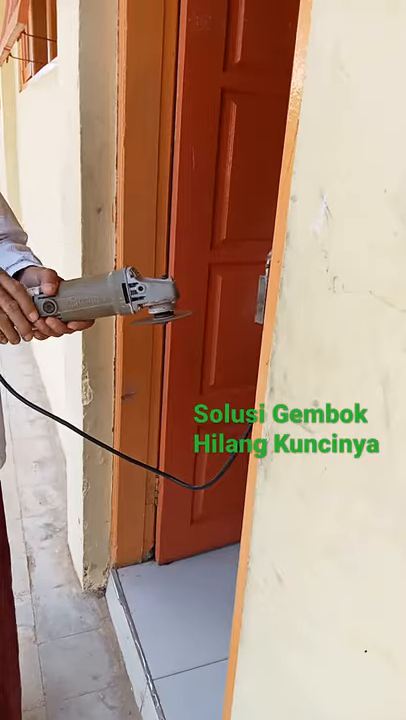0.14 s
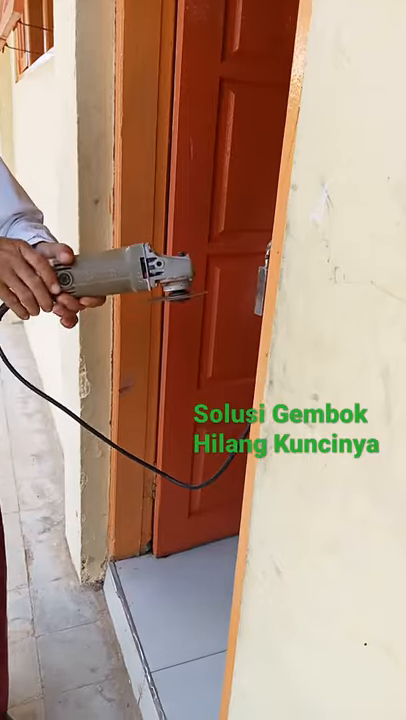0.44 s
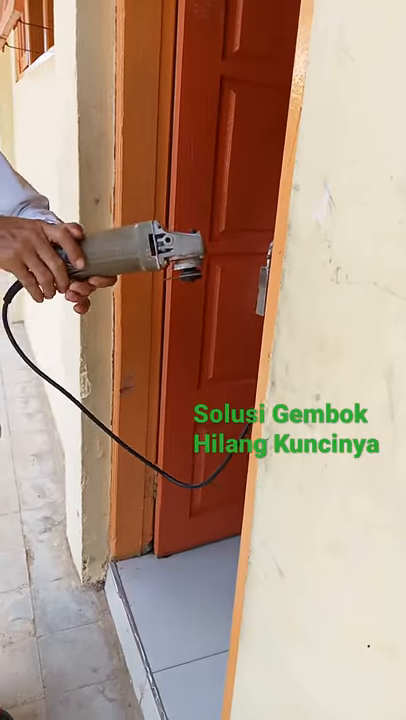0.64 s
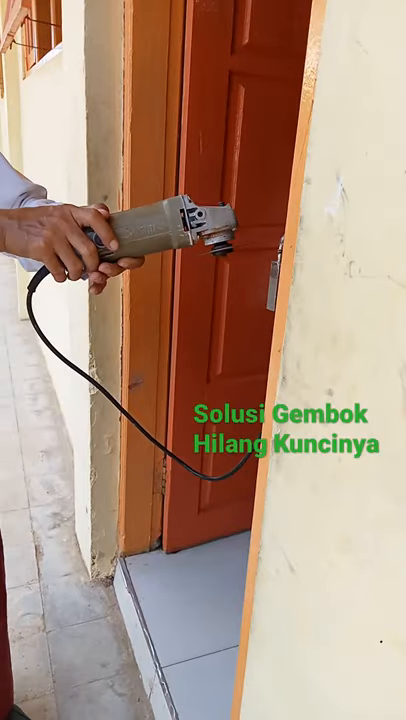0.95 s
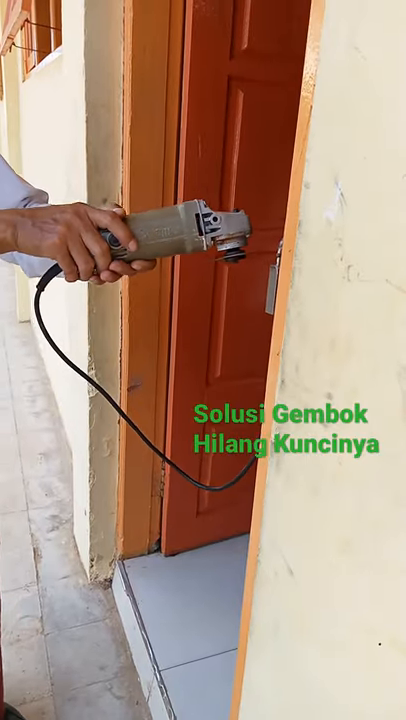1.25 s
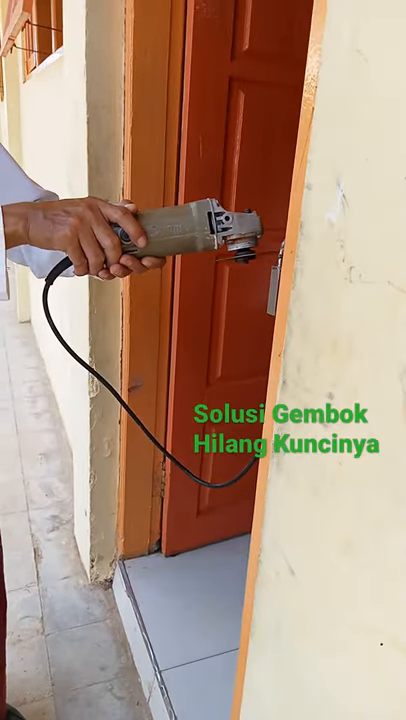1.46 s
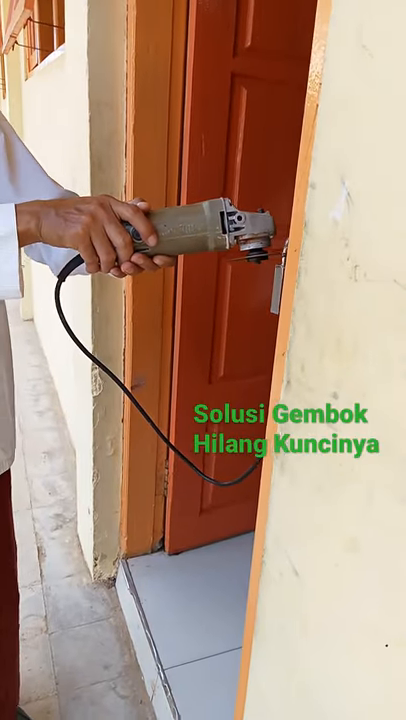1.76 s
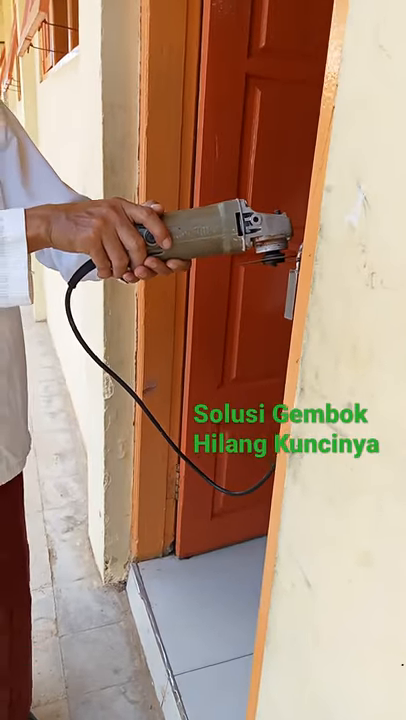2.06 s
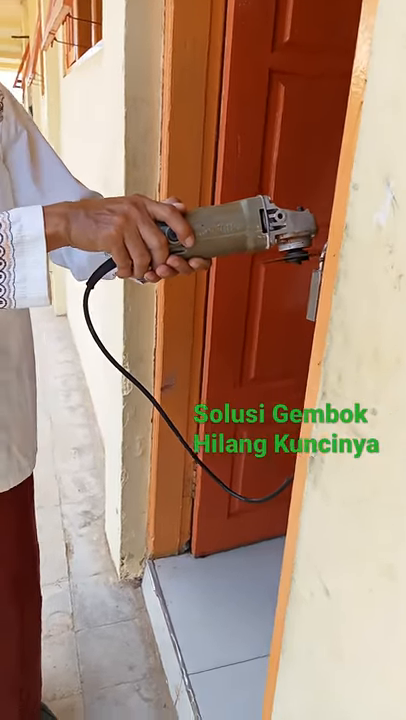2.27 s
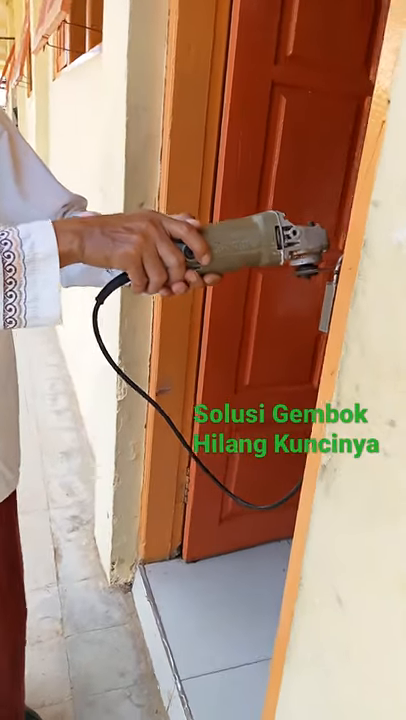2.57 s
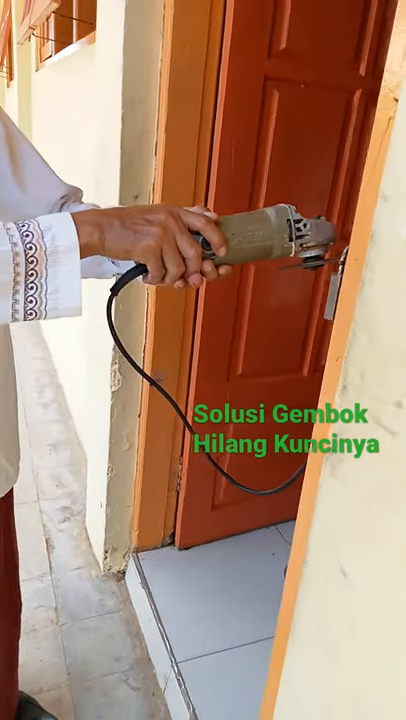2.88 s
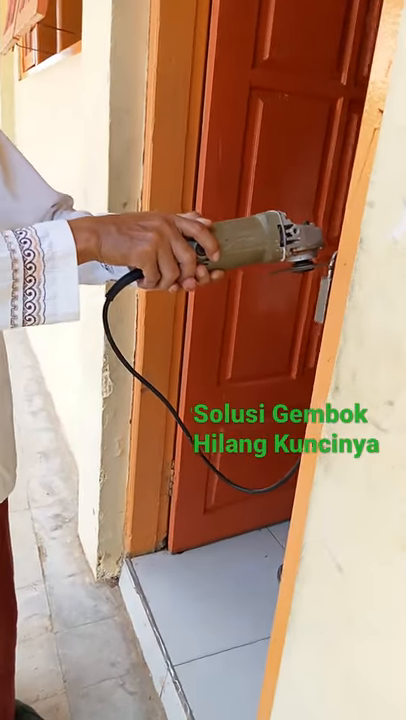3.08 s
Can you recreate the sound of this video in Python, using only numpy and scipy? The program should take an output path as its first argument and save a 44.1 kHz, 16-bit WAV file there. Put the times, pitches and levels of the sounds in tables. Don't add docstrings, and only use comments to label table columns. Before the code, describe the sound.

An angle grinder starts after about 0.08 s of silence, swelling to full roar by 0.35 s. Its high gear whine climbs quickly, then more slowly, nearly levelling by 2 s, strongest near 2.2 s. Bright rushing air, dense housing rattle, small gear knocks and faint metallic disc rings continue to 3.2 s, the tone shifting as the tool turns. No cutting; tight porch reflections, close mono phone sound, still running at the end.

```python
import sys
import numpy as np
from scipy import signal
from scipy.io import wavfile
from scipy.ndimage import uniform_filter1d, map_coordinates

SR = 44100
rng = np.random.default_rng(int(sys.argv[2]) if len(sys.argv) > 2 else 0)


def persist_wave(psi):
    counts = np.round(np.clip(psi, -1, 1) * 32767).astype(np.int16)
    wavfile.write(sys.argv[1], SR, np.atleast_2d(counts).T)


def ratio(d):
    e = np.asarray(d, float) / 20
    return 10 ** e


N = 142884

# time in seconds, roar in dB, guard ring in dB,
# brightness in dB, low body in dB.
MOTOR = [(.085, -40, -1, 5, -1), (.16, -30.5, 4, 2.5, 6.5), (.25, -23.5, 1, 1, -0.5),
         (.34, -18.5, 6.5, 1.5, 4), (.5, -19, 8.5, 5.5, 3), (.7, -19, 8.5, 3, 1.5), (.9, -18, 4.5, 2, 0.5),
         (1.1, -18.5, 2.5, 1, 0.5), (1.35, -18.5, -1, 1, 0), (1.6, -18, -2, 1, 1),
         (1.85, -18, -11, -0.5, -1.5), (2.1, -16.5, -6, -0.5, -4), (2.3, -17.5, -11, 1, 3),
         (2.55, -17.5, 1.5, -1.5, 2), (2.8, -18, -4, -2, -2), (3.0, -18.5, 0.5, -0.5, -1),
         (3.24, -17, -3, -2, -5)]
# centre in Hz, width in Hz, level in dB.
HOUSING = [(398, 242, -8), (838, 137, -2.5), (986, 106, -4.5), (1259, 375, 0.5), (1770, 150, -5.5),
           (2093, 100, -3.5), (2546, 93, -7), (3334, 350, -1), (4785, 500, 3), (7340, 840, 5.5),
           (9440, 860, 8), (9945, 1450, 3), (11100, 430, -12), (15200, 700, -11)]
# frequency in Hz, level in dB per Hz.
AIR = [(35, -61), (60, -17), (570, -13), (1320, 2.5), (4010, -3), (4820, 3.5), (7860, -10), (9460, -1.5),
       (15400, -12.5)]
# time in seconds, unbalance in dB, second pinion harmonic in dB.
TURN = [
    (.1, 0, 0),
    (.5, 2, 0),
    (1.15, -1, -8),
    (1.3, -9, -9),
    (1.9, -5, -8),
    (2.3, 2, 2),
    (2.75, 0, 2),
    (2.95, -7, -4),
    (3.24, -8, -5),
]
# time in seconds, extra path in m.
DOOR = [
    (0, 1.13),
    (1.0, 0.72),
    (2.0, 0.44),
    (3.24, 0.24),
]
# delay in seconds, level in dB.
WALLS = [(.0043, -17), (.0071, -24.5), (.0118, -20.5), (.0173, -11), (0.025, -26.5)]
# time in seconds, pinion in dB, fan in dB.
WHINE = [(.1, -52, -55), (.19, -31, -42), (.52, -24, -63), (.68, -26, -27), (.76, -33, -39),
         (.92, -28, -30), (.99, -33, -40), (1.04, -25.5, -48), (1.14, -35, -44), (1.22, -26.5, -40),
         (1.4, -30, -32), (1.55, -25, -38), (2.2, -20.5, -26), (2.45, -24, -28.5), (2.6, -35, -30),
         (2.85, -32, -30), (2.95, -25.5, -32), (3.24, -23, -27.5)]
# multiple of the shaft, level in dB.
ROTOR = [(1, -38), (3, -50), (5, -50), (11, -46), (13, -50), (24, -44)]
# time in seconds, echo strength 0-1.
FLOOR_ECHO = [
    (0, .2),
    (.3, .55),
    (.7, .45),
    (.9, 0),
    (3.24, 0),
]
# time in seconds, peak in dB.
KNOCKS = [(0.0864, -32), (0.1024, -19), (0.1565, -10), (0.184, -10), (0.483, 3), (0.7064, 0), (0.8205, 0),
          (2.168, -43), (2.1966, -2), (2.4485, -3), (2.54, -5), (2.698, 2), (2.8294, -4), (3.03, -5)]
# start in seconds, length in seconds, frequency in Hz, level in dB.
DISC = [
    (0.884, 0.16, 2515, -28.5),
    (0.995, 0.34, 987, -30.5),
    (1.05, .25, 1770, -31.5),
    (1.554, 0.23, 1770, -30),
    (1.65, 0.36, 1585, -33),
    (2.35, 0.14, 223, -39.5),
    (2.444, 0.33, 1310, -26.5),
    (2.72, 0.13, 2540, -28),
    (2.74, 0.1, 1457, -27),
    (2.95, 0.17, 2545, -32.5),
]
# centre in Hz, width in Hz, depth 0-1.
MIC_DIPS = [(7640, 1170, 0.64), (11940, 1040, 0.42), (560, 270, 0.17)]

FULL_ROAR_DB, HOUSING_DB, AIR_DB, RUMBLE_DB = -18.5, -0.5, -3, -66
RATTLES_PER_S, RATTLE_SPREAD_DB, RATTLE_DB = 900, 3, -4
DOOR_DB, SOUND_M_PER_S = -18, 343
TOP_HZ, LAG_HZ, LAG_S, SURGE_HZ, SURGE_S = 530.3, 130.5, .62, 27, .125
PINION_TEETH, FAN_MULTIPLE, FLOOR_LAG_S = 12, 4, .007576
CHATTER_DB, CHATTER_PER_S = -30, 430
KNOCK_DB, KNOCK_S = -11, .0013
DISC_WIDTH_HZ = 17
START_S, FADE_S, MIC_LOW_HZ, MIC_TOP_HZ, HEADROOM = 0.0787, 0.0017, 85, 15500, 1.6


def level(x, db):
    return x * ratio(db) / np.sqrt(np.mean(x ** 2))


def curve(table, col):
    table = np.array(table)
    return np.interp(np.arange(N) / SR, table[:, 0], table[:, col])


def walk(rate_hz):
    hold = int(SR / rate_hz)
    steps = np.repeat(rng.standard_normal(N // hold + 1), hold)
    return 1.18 * uniform_filter1d(uniform_filter1d(steps, hold), hold)[:N]


def ring(x, hz, width_hz):
    return signal.lfilter(*signal.iirpeak(hz, hz / width_hz, SR), x)


def ring_twice(x, hz, width_hz):
    return ring(ring(x, hz, width_hz), hz, width_hz)


def facing_db(hz):
    if hz > 8000:
        return curve(MOTOR, col=3)
    if 4000 < hz < 5500:
        return curve(MOTOR, col=2)
    return curve(MOTOR, col=4) * (hz < 1600)


def housing():
    chance = rng.random((3, N))
    size_db = np.minimum(-RATTLE_SPREAD_DB * np.log(chance[1] + 1e-9), 14)
    hits = (chance[0] < RATTLES_PER_S / SR) * ratio(size_db) * np.sign(chance[2] - .5)
    drive = rng.standard_normal(N) + level(hits, RATTLE_DB)
    drive = drive * ratio(0.98 * walk(8.8) + 1.23 * walk(70))
    out = 0
    for hz, width_hz, db in HOUSING:
        wander_db = (.8 if hz > 4000 else 1.3) * walk(5)
        mode = level(ring_twice(drive, hz, 1.095 * width_hz), 0)
        out = out + ratio(db + wander_db + facing_db(hz)) * mode
    return level(out, HOUSING_DB)


def air():
    out, gust, spectrum = 0, walk(5.61), np.array(AIR)
    for hz in 30 * 2 ** np.arange(0, 9.2, 1 / 3):
        band = ring_twice(rng.standard_normal(N), hz, hz / 3)
        db = np.interp(np.log(hz), np.log(spectrum[:, 0]), spectrum[:, 1])
        db = db + .5 * gust + 0.96 * walk(12)
        if hz < 700:
            db = db + .5 * curve(TURN, col=1)
        if hz > 10000:
            db = db + curve(MOTOR, col=3)
        out = out + ratio(db) * band
    return level(out, AIR_DB)


def porch(roar):
    heard_at = np.arange(N) - curve(DOOR, col=1) / SOUND_M_PER_S * SR
    roar = roar + ratio(DOOR_DB) * map_coordinates(roar, [heard_at], mode="mirror")
    return roar + sum(ratio(db) * np.roll(roar, int(s * SR)) for s, db in WALLS)


def whine():
    t = np.arange(N) / SR
    shaft_hz = TOP_HZ - LAG_HZ * np.exp(-t / LAG_S) - SURGE_HZ * np.exp(-t / SURGE_S)
    turns = np.cumsum(shaft_hz + .15 * walk(30)) / SR

    def tone(multiple, db):
        return np.sqrt(2) * ratio(db) * np.sin(2 * np.pi * (multiple * turns + rng.random()))

    pinion = tone(PINION_TEETH, curve(WHINE, col=1) + 1.8 * walk(35))
    pinion = pinion + curve(FLOOR_ECHO, col=1) * np.roll(pinion, round(FLOOR_LAG_S * SR))
    fan = tone(FAN_MULTIPLE, curve(WHINE, col=2) - .5 + 2.8 * walk(80))
    roar_rise_db = curve(MOTOR, col=1) - FULL_ROAR_DB
    chatter_db = CHATTER_DB + roar_rise_db + .5 * curve(TURN, col=2)
    out = pinion + fan + walk(CHATTER_PER_S) * tone(PINION_TEETH, chatter_db)
    for multiple, db in ROTOR:
        if multiple == 1:
            turn_db = curve(TURN, col=1)
        elif multiple == 2 * PINION_TEETH:
            turn_db = curve(TURN, col=2)
        else:
            turn_db = 4.4 * walk(9.2)
        out = out + tone(round(multiple), db + roar_rise_db + turn_db + 1.5 * walk(20))
    return out


def knocks():
    out, t = np.zeros(N), np.arange(300) / SR
    envelope = np.e * t / KNOCK_S * np.exp(-t / KNOCK_S)
    for s, db in KNOCKS:
        i = int(s * SR)
        out[i:i + 300] += ratio(db + KNOCK_DB) * rng.standard_normal(300) * envelope
    return 3 * ring_twice(out, 4800, 1200) + 3 * ring_twice(out, 9500, 1500)


def disc():
    out, t = 0, np.arange(N) / SR
    for s, length_s, hz, db in DISC:
        swell = np.sin(np.pi * np.clip((t - s) / length_s, 0, 1))
        out = out + swell * level(ring(rng.standard_normal(N), hz, DISC_WIDTH_HZ), db)
    return out


def rumble():
    return level(ring(rng.standard_normal(N), 30, 25), RUMBLE_DB)


def scene():
    roar = level(porch(housing() + air()), 3.01) * ratio(curve(MOTOR, col=1))
    mono = roar + whine() + knocks() + disc() + rumble()
    return np.array([mono, mono])


def roll_off(x):
    return signal.sosfilt(signal.butter(12, 16600, fs=SR, output="sos"), x)


def record(dry):
    for hz, width_hz, depth in MIC_DIPS:
        dry = dry - np.clip(depth, 0, 1) * ring(dry, hz, width_hz)
    gate = np.clip((np.arange(N) / SR - START_S) / FADE_S, 0, 1)
    rounded = HEADROOM * np.tanh(dry * gate / HEADROOM)
    low = signal.butter(2, MIC_LOW_HZ, "high", fs=SR, output="sos")
    top = signal.ellip(14, .3, 100, MIC_TOP_HZ, fs=SR, output="sos")
    mix = signal.sosfilt(np.vstack([low, top]), rounded)
    return roll_off(mix)


dry = scene()
out = record(dry)
persist_wave(out)
```